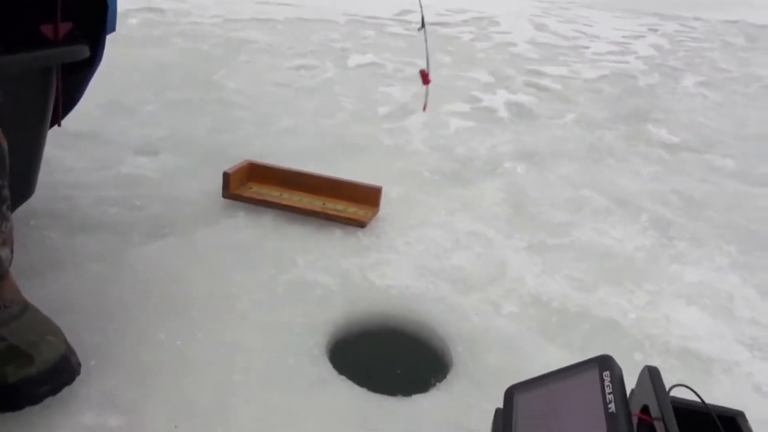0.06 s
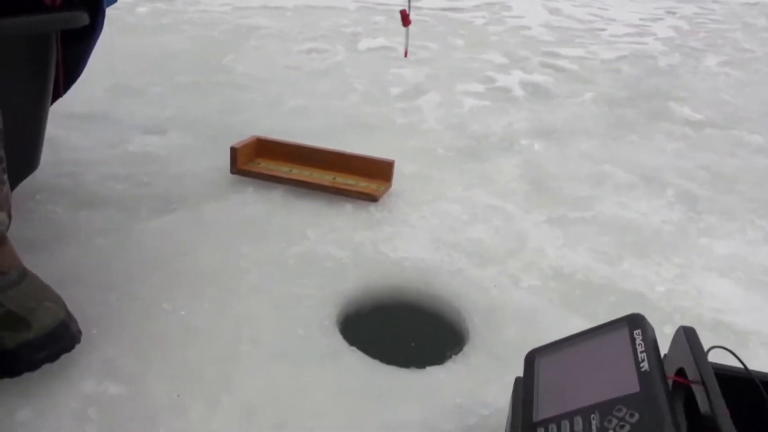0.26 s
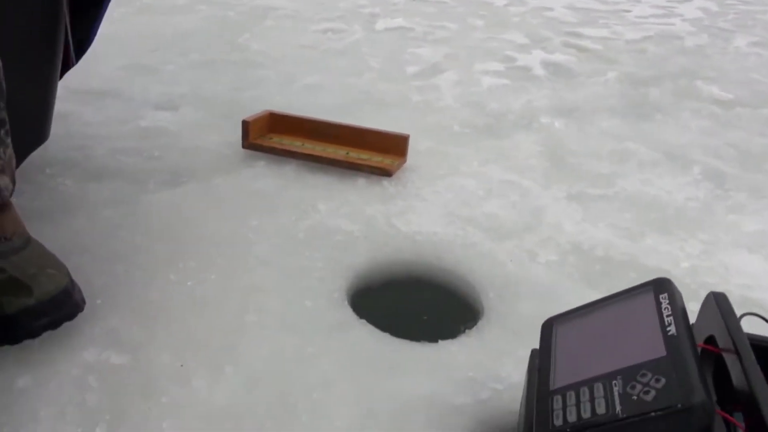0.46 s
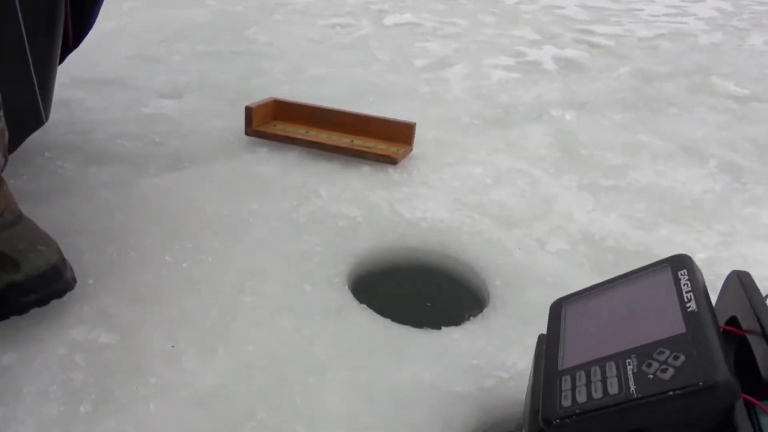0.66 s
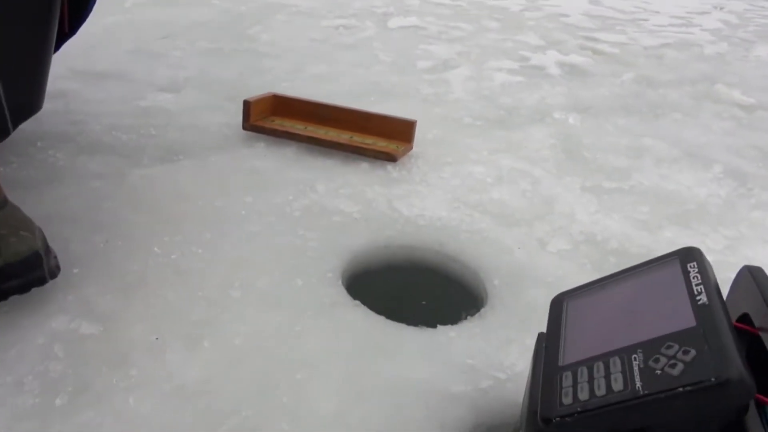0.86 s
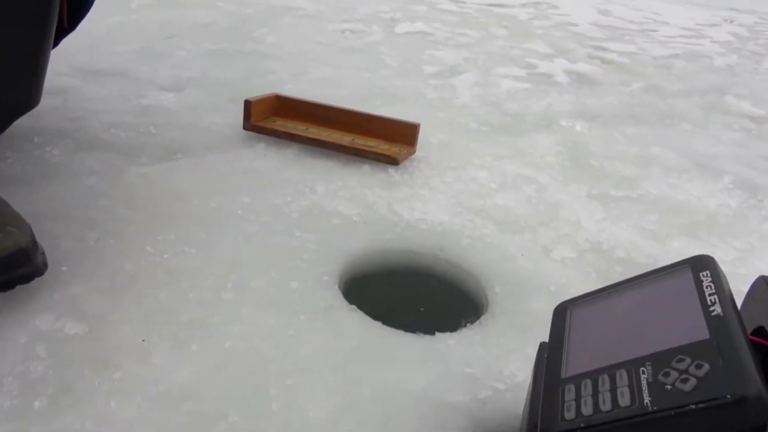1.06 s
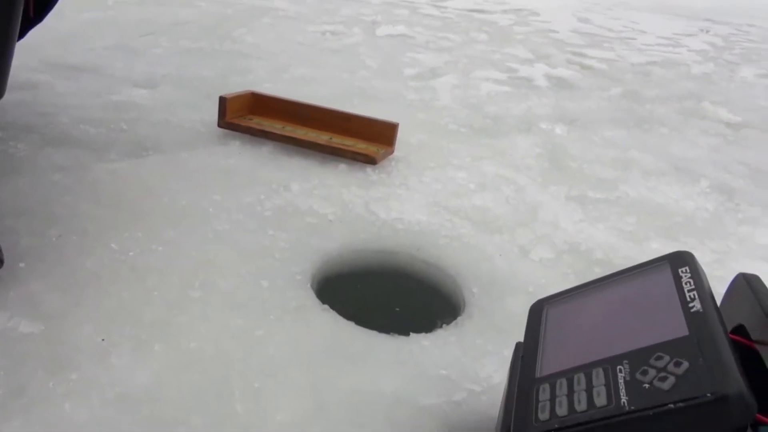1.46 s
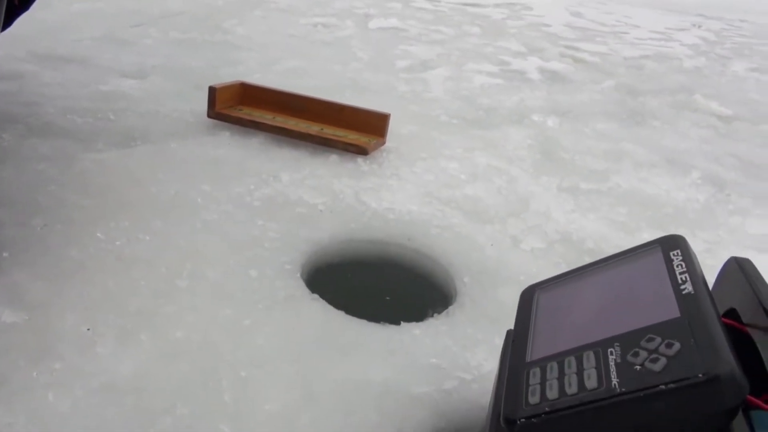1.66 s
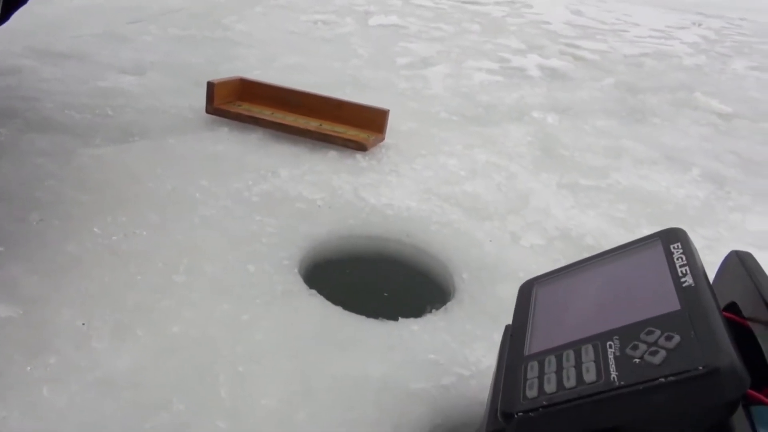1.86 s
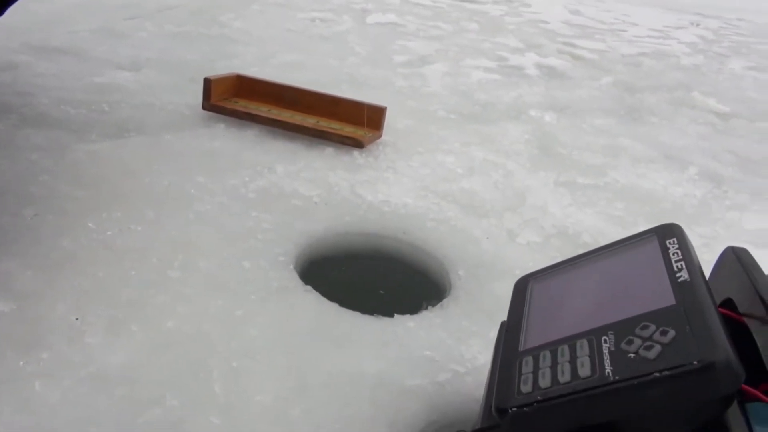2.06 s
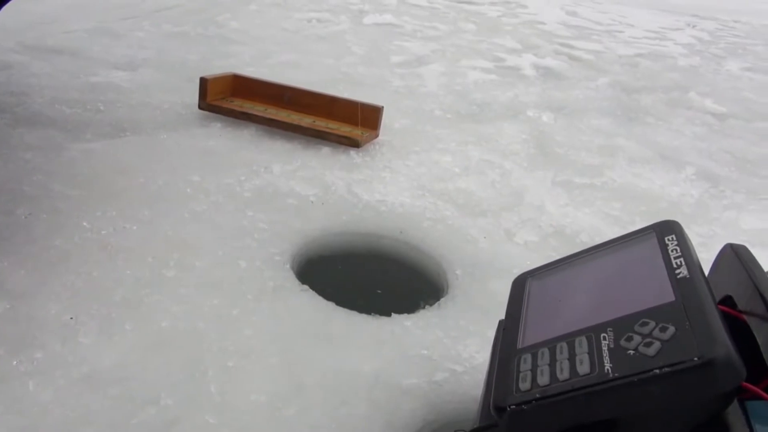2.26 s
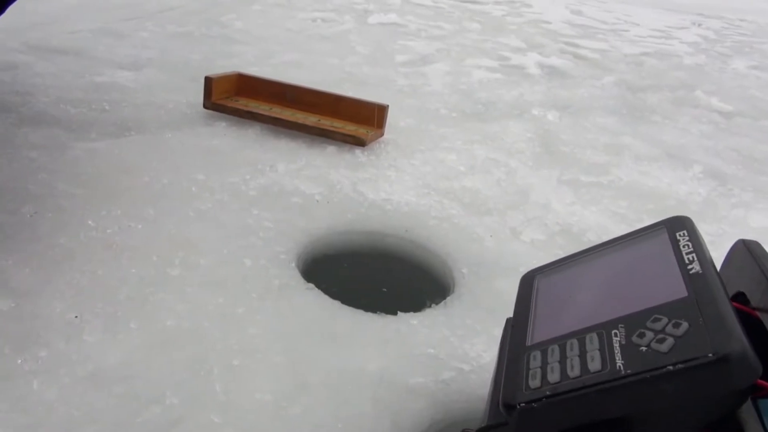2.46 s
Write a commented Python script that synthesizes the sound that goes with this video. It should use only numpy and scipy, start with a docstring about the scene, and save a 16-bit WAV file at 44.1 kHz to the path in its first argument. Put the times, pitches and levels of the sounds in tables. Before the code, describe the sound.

Gear handled close up, with rustling, knocks and deep bumps, then faint wind.

```python
"""A rustle with gritty scrapes, hollow knocks and four deep bumps: gear handled close to a camera on a frozen
lake. Then near quiet: faint wind, small tackle ticks and squeaks, a soft hiss like sliding line. Friction is a
stream of tiny slips; rubs and knocks ring the handled shell, later a hollow part. Bumps on the camera body are
damped low swells of falling pitch. The tackle squeaks by stick-slip; wind rumbles at the microphone."""
import sys
import numpy as np
from scipy import signal
from scipy.fft import rfft, irfft
from scipy.io import wavfile

SR = 44100
rng = np.random.default_rng(int(sys.argv[2]) if len(sys.argv) > 2 else 0)


def to_wav(s):
    """Save 16-bit WAV."""
    ch = np.atleast_2d(s).T  # columns
    pcm = np.round(np.clip(ch, -1, 1) * 32767)  # PCM
    wavfile.write(sys.argv[1], SR, pcm.astype(np.int16))


N = 114660
T = np.arange(N) / SR
IMPACT_RISE_S = 0.0023


def amp(db):
    """Decibels to gain."""
    return 10 ** (np.asarray(db) / 20)


def unit(x):
    """Scale to rms 1."""
    return x / np.sqrt(np.mean(x ** 2) + 1e-20)


def level(points):
    """Gain along a (time [s], level [dB]) curve."""
    return amp(np.interp(T, *np.transpose(points)))


def uneven(spread_db, step_s):
    """Wandering gain, one random knot per step."""
    knots_s = np.arange(0, T[-1] + 1, step_s)
    return amp(spread_db * np.interp(T, knots_s, rng.standard_normal(N)[:len(knots_s)]))


def stroke(start_s, rise_s, hold_s, fade_s):
    """Envelope: linear rise, hold, exponential fade."""
    age_s = T - start_s
    return np.clip(age_s / rise_s, 0, 1) * np.exp(-np.maximum(age_s - rise_s - hold_s, 0) / fade_s)


def db_at(spectrum, hz):
    """Interpolate a spectrum over log frequency."""
    knots_hz, db = np.transpose(spectrum)
    return np.interp(np.log(hz + 1), np.log(knots_hz + 1), db)


def tilted(spectrum, db_per_oct):
    """Brighten or dull a spectrum."""
    return [(hz, db + db_per_oct * np.log2(hz)) for hz, db in spectrum]


def colour(x, spectrum, size=8192):
    """Apply a spectrum as a minimum-phase filter of unit energy."""
    log_gain = np.log(amp(db_at(spectrum, abs(np.fft.fftfreq(size, 1 / SR)))))
    response = np.exp(np.conj(signal.hilbert(log_gain)))
    taps = np.fft.ifft(response).real[:size // 2]
    return signal.fftconvolve(x, taps / np.linalg.norm(taps))[:N]


def ring(hz, width_hz):
    """One struck mode: a decaying sine of unit energy."""
    t = T[:SR // 10]
    wave = np.exp(-np.pi * width_hz * t) * np.sin(2 * np.pi * hz * t)
    return wave / np.linalg.norm(wave)


def grit(slips_per_s=5000, spread_db=2.5, hiss_db=-4):
    """Friction: tiny slips of uneven size over smooth hiss."""
    sizes = amp(spread_db * np.minimum(rng.exponential(1, N), 4))
    slips = sizes * rng.choice([-1, 1], N) * (rng.random(N) < slips_per_s / SR)
    return unit(unit(slips) + amp(hiss_db) * rng.standard_normal(N))


def rubbing():
    """Sliding contact: a clumpy rustle under short scrapes."""
    # rustle envelope (time [s], level [dB])
    rustle = [(0, -48), (.03, -64), (.08, -43), (.11, -42), (.14, -41.5), (.152, -44.5), (.19, -47),
              (.21, -53.5), (.27, -51.5), (.32, -60), (.4, -58), (.46, -63.5), (.52, -71.5), (.6, -79)]
    # scrapes (start [s], level [dB], rise [s], hold [s], fade constant [s], tilt [dB/oct])
    scrapes = [(0.057, -47.5, 0.0059, 0.0038, 0.0045, 1.5), (0.0869, -33.5, 0.00037, 0.0025, 0.0064, 0.5),
               (0.094, -37.5, 0.0011, 0.0056, 0.0085, 0.5), (.156, -32, 0.0027, 0.0017, 0.0043, 1.5),
               (0.164, -38, 0.0043, .015, 0.016, 1), (0.251, -47, 0.0027, 0.0029, 0.0057, -0.5),
               (0.279, -46, 0.0084, 0.008, 0.0034, -0.5), (0.335, -38, 0.0062, 0.0058, 0.0096, 0),
               (0.411, -32, 0.008, 0.0023, 0.0088, 0.5)]
    # friction spectrum (frequency [Hz], level [dB])
    spectrum = [(50, -5), (200, 0), (380, 1), (560, -5.5), (1100, -4), (1450, -5.5), (2100, -4),
                (2500, -7.5), (2850, -4.5), (3400, -5), (4600, -4.5), (5900, -11), (9000, -11.5),
                (12000, -20), (15000, -29)]
    out = colour(grit() * level(rustle) * uneven(spread_db=2.5, step_s=0.004), spectrum)
    for start_s, db, rise_s, hold_s, fade_s, db_per_oct in scrapes:
        scrape = grit() * stroke(start_s, rise_s, hold_s, fade_s)
        out += amp(db) * colour(scrape, tilted(spectrum, db_per_oct))
    return out


def knocks(tone_db=-4.5):
    """Hollow knocks: each blow is a gritty burst plus one brief tone."""
    # blows (start [s], level [dB], tone [Hz])
    blows = [(.001, -28, 1560), (.021, -42, 1500), (0.04, -37.5, 1520), (0.089, -35.5, 1095),
             (0.385, -53.5, 854), (0.4769, -40, 827)]
    # burst spectrum (frequency [Hz], level [dB])
    spectrum = [(100, 0), (420, 6.5), (650, -1.5), (1000, -8.5), (2100, -11), (4000, -16.5), (9000, -23),
                (15000, -41)]
    out = np.zeros(N)
    for start_s, db, hz in blows:
        blow = amp(db) * stroke(start_s, IMPACT_RISE_S, 0, fade_s=0.003)
        tone = amp(tone_db) * blow * np.sin(2 * np.pi * hz * (T - start_s))
        out += colour(grit() * blow, spectrum) + tone
    return out


def shell(contact, contact_move_s=0.29, direct_db=-3):
    """Contact rings the handled shell, then moves on to a hollow part with modes of its own."""
    # shell modes (frequency [Hz], width [Hz], gain [dB])
    shell_modes = [(390, 20, -8.5), (816, 135, -1.5), (1016, 150, -1.5), (1276, 70, 3), (2000, 30, 2),
                   (2858, 70, 1.5), (4155, 79, -0.5), (4680, 60, -5)]
    # hollow part modes, rung once the contact moves there (frequency [Hz], width [Hz], gain [dB])
    hollow_modes = [(700, 28, -2.5), (900, 77, 7.5), (1705, 65, 0), (1860, 48, -11), (2215, 61, 2),
                    (3900, 87, -15), (4330, 75, -5.5)]
    t = T[:SR // 8]
    moved = T > contact_move_s
    out = amp(direct_db) * contact
    for held, modes in (~moved, shell_modes), (moved, hollow_modes):
        response = np.zeros(len(t))
        for hz, width_hz, db in modes:
            gain = amp(db) * 2 * np.pi * width_hz / SR
            response += gain * np.exp(-np.pi * width_hz * t) * np.cos(2 * np.pi * hz * t)
        out += signal.fftconvolve(contact * held, response)[:N]
    return out


def wind():
    """Lumpy rumble at the microphone plus a smooth distant wash."""
    # rumble envelope (time [s], level [dB])
    rumble_curve = [(0, -52.5), (.7, -48.5), (.9, -46.5), (1.45, -48.5), (1.74, -51), (2.1, -48.5),
                    (2.3, -48), (2.6, -48.5)]
    # rumble spectrum (frequency [Hz], level [dB])
    rumble_spectrum = [(10, -50), (25, -17), (40, -1), (58, 0), (85, -0.5), (130, -8), (220, -14),
                       (350, -22), (600, -31), (1000, -37.5), (4000, -77.5)]
    # wash envelope (time [s], level [dB])
    wash_curve = [(0, -55), (.55, -64), (.8, -64), (1.1, -64), (1.5, -68), (2, -63.5), (2.15, -72.5),
                  (2.6, -72)]
    # wash spectrum (frequency [Hz], level [dB])
    wash_spectrum = [(100, 12), (800, 4), (1600, -2), (2600, -7.5), (4500, -7.5), (6500, -10.5),
                     (11000, -20.5), (13200, -14.5), (13900, -36.5)]
    rumble, wash = rng.standard_normal((2, N))
    gusts = uneven(spread_db=1.5, step_s=0.08) * level(rumble_curve)
    return colour(rumble, rumble_spectrum) * gusts + colour(wash, wash_spectrum) * level(wash_curve)


def bumps(sweep_hz=91.2, settle_s=0.0059, damping=1.93):
    """Camera bumps swell as their pitch drops, then damp fast; the case rings and shudders."""
    # bumps (start [s], peak [dB], final pitch [Hz], time to peak [s])
    hits = [(0.22, -7.7, 60.5, 0.019), (0.2905, -11, 57.6, 0.019), (0.4364, -9.5, 59.6, 0.018),
            (0.537, -30, 58.4, 0.025), (0.5953, -10.5, 60, 0.02), (0.6439, -30, 59.5, 0.026),
            (0.7929, -33, 66.3, 0.018), (0.855, -33, 85, 0.015), (1.092, -38, 69.6, 0.024),
            (1.709, -34, 67, 0.021)]
    case_hz, case_db, case_delay_s = 182, -22, 0.0031
    shudder_db = -30.5
    out, shake = np.zeros(N), np.zeros(N)
    for start_s, db, hz, peak_s in hits:
        age_s = np.clip(T - start_s, 0, 10 * peak_s)
        cycles = hz * age_s + sweep_hz * settle_s * (1 - np.exp(-age_s / settle_s))
        swell = age_s / peak_s * np.exp((1 - (age_s / peak_s) ** damping) / damping)
        struck_s = start_s + case_delay_s
        case_envelope = amp(case_db) * stroke(struck_s, IMPACT_RISE_S, 0, fade_s=0.012)
        case = case_envelope * np.sin(2 * np.pi * case_hz * (T - struck_s))
        out += amp(db) * (case - swell * np.sin(2 * np.pi * cycles))
        shake += amp(db + shudder_db) * stroke(start_s, peak_s, 0, fade_s=0.037)
    panel = ring(hz=156.3, width_hz=86)
    shudder = signal.oaconvolve(grit(), signal.fftconvolve(panel, panel))[:N]
    return out + shake * unit(shudder)


def tackle_ticks():
    """Light tackle contacts: short noise snaps of varied brightness."""
    # ticks (start [s], level [dB], tilt [dB/oct])
    ticks = [(0.571, -62.5, 1), (0.788, -58.5, -4.5), (1.222, -62, -1), (1.416, -57.5, 9), (1.5804, -65, 1),
             (1.608, -56, -8.5), (1.782, -52.5, -1.5), (1.808, -53.5, -6), (1.82, -59, -0.5),
             (1.881, -57, 0.5), (2.134, -65.5, -3)]
    # snap spectrum (frequency [Hz], level [dB])
    spectrum = [(500, -5), (1200, -1), (5000, -2.5), (9000, 3.5), (11500, -5.5), (13000, -15), (14200, -45)]
    out, noise = np.zeros(N), rng.standard_normal(N)
    for start_s, db, db_per_oct in ticks:
        snap = noise * stroke(start_s, IMPACT_RISE_S, 0, fade_s=0.0045)
        out += amp(db) * colour(snap, tilted(spectrum, db_per_oct))
    return out


def sliding_hiss(catches_per_s=180, crackle_db=-8):
    """Soft sliding friction; random catches add a fine crackle."""
    # hiss envelope (time [s], level [dB])
    curve = [(0, -80), (1.05, -78.5), (1.25, -73), (1.39, -73), (1.43, -66.5), (1.52, -73), (1.66, -74),
             (1.75, -70.5), (2.02, -75), (2.1, -83), (2.6, -82.5)]
    # hiss spectrum (frequency [Hz], level [dB])
    spectrum = [(1800, -12.5), (2500, -1), (3300, -5), (4600, -2.5), (6500, 1), (8000, 1), (10000, 4.5),
                (11300, 1), (13000, -15), (15000, -34.5)]
    catches = rng.standard_normal(N) * (rng.random(N) < catches_per_s / SR)
    crackle = signal.oaconvolve(unit(catches) * level(curve), ring(hz=2600, width_hz=280))[:N]
    return colour(grit() * level(curve), spectrum) + amp(crackle_db) * crackle


def tackle_squeaks(rub_db=-3):
    """Stick-slip: each short rub rings one mode over its own friction noise."""
    # squeaks (start [s], level [dB], pitch [Hz])
    squeaks = [(1.101, -57.5, 2510), (1.132, -63, 2530), (1.312, -66, 2660), (1.367, -64, 2600),
               (1.417, -60, 2640), (1.499, -58.5, 2500), (1.521, -69, 2520), (1.581, -68, 2420),
               (1.607, -60.5, 2580), (1.7012, -62, 2740), (1.756, -62.5, 2500), (1.9554, -61.5, 2470)]
    # rub spectrum (frequency [Hz], level [dB])
    spectrum = [(500, -6.5), (1200, 0), (1900, -19), (2950, -7), (3900, -9), (8000, -36)]
    out, slips = np.zeros(N), grit()
    for start_s, db, hz in squeaks:
        rub = amp(db) * slips * stroke(start_s, rise_s=0.0016, hold_s=0, fade_s=0.0053)
        squeak = signal.oaconvolve(rub, ring(hz, width_hz=280))[:N]
        out += squeak + amp(rub_db) * colour(rub, spectrum)
    return out


def scene():
    """All sources, equal in both channels."""
    handling = bumps() + shell(rubbing() + knocks())
    tackle = sliding_hiss() + tackle_squeaks() + tackle_ticks()
    mono = handling + tackle + wind()
    return np.array([mono, mono])


def record(dry, cutoff_hz=15150):
    """Slight lean to the left, most in the bass; then a steep low-pass."""
    # channel balance (frequency [Hz], left minus right [dB])
    balance = [(150, 1.2), (800, 0.49)]
    lean_db = db_at(balance, np.fft.rfftfreq(2 * N, 1 / SR)) / 2
    panned = irfft(rfft(dry, 2 * N) * amp([lean_db, -lean_db]))[:, :N]
    lowpass = signal.firwin(511, cutoff_hz, window=("kaiser", 9), fs=SR)
    return signal.oaconvolve(panned, lowpass[None], "same")


dry = scene()
out = record(dry)
to_wav(out)
```